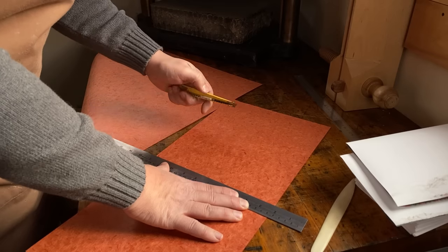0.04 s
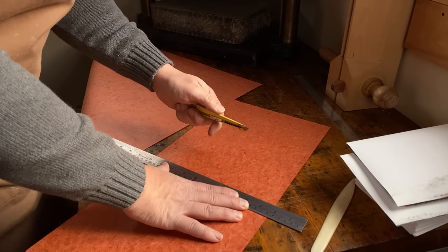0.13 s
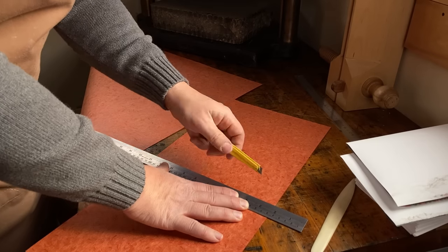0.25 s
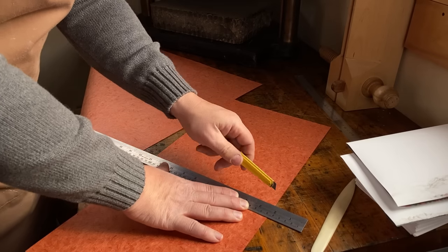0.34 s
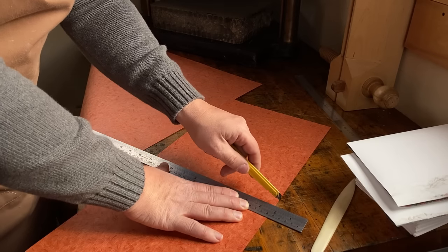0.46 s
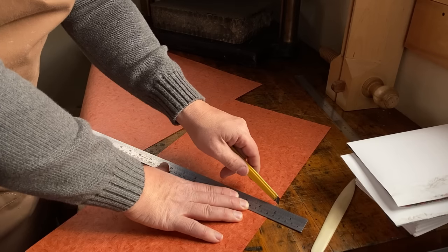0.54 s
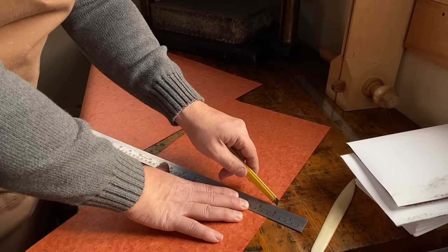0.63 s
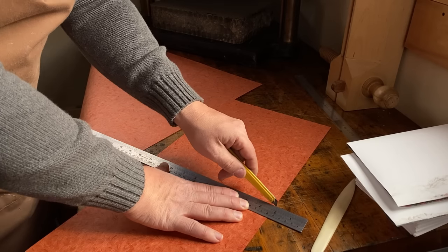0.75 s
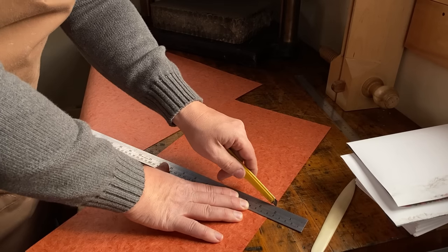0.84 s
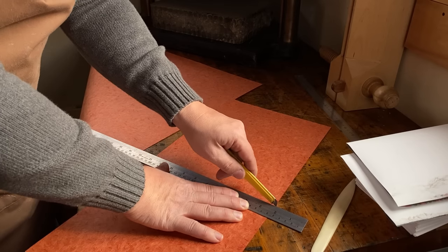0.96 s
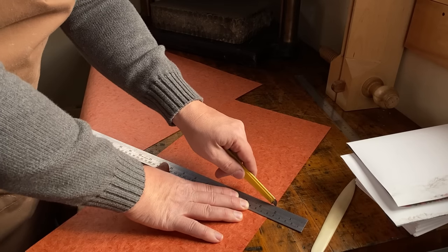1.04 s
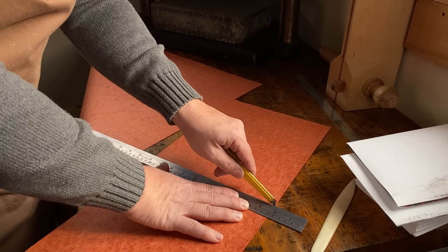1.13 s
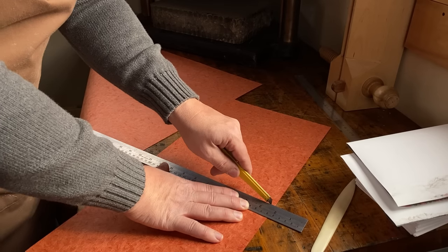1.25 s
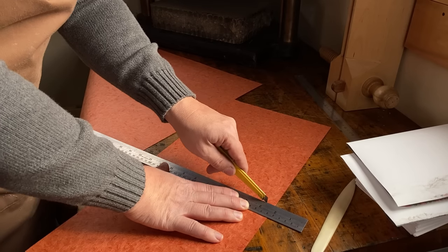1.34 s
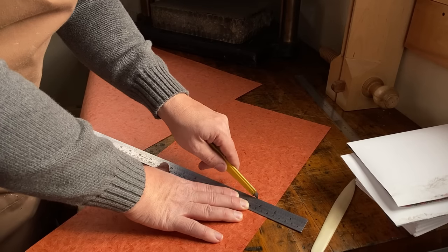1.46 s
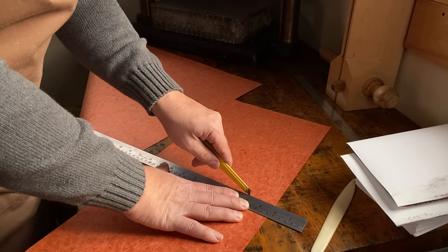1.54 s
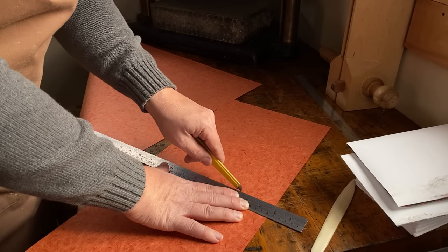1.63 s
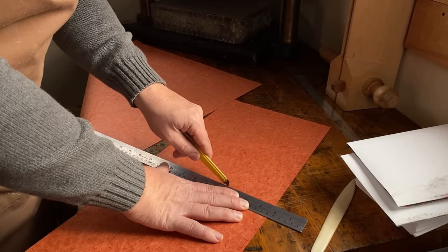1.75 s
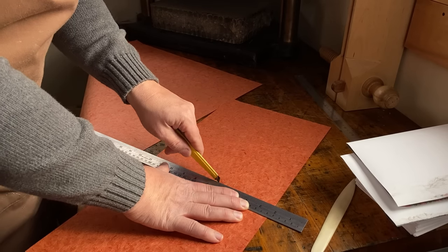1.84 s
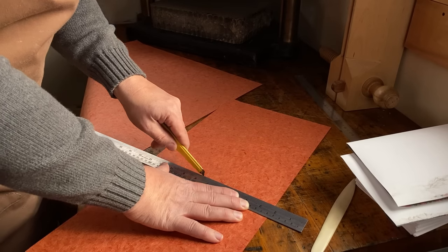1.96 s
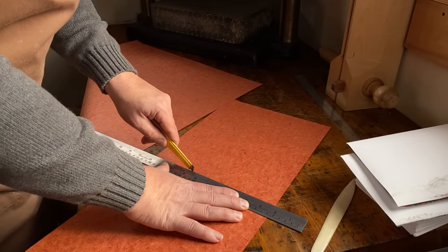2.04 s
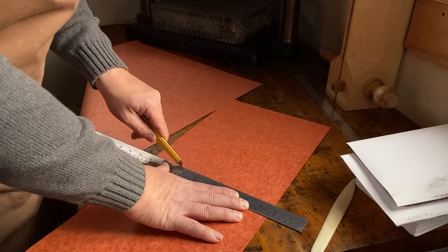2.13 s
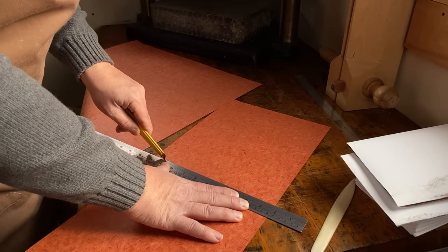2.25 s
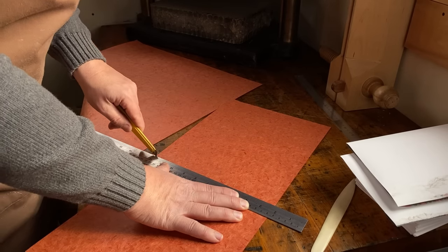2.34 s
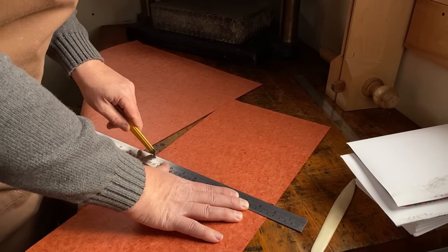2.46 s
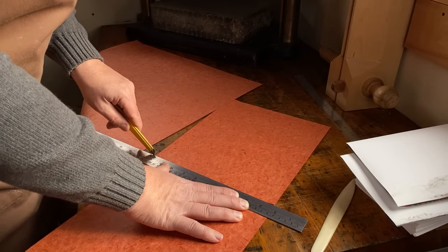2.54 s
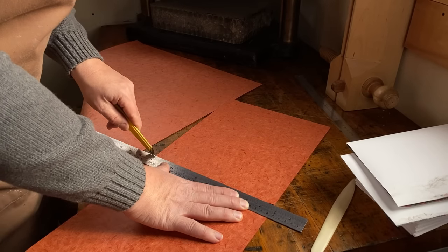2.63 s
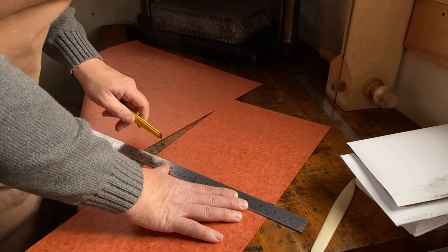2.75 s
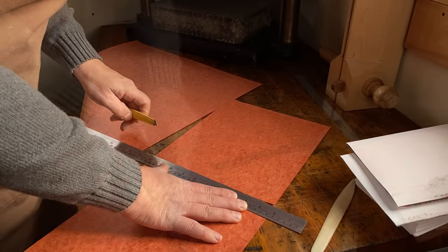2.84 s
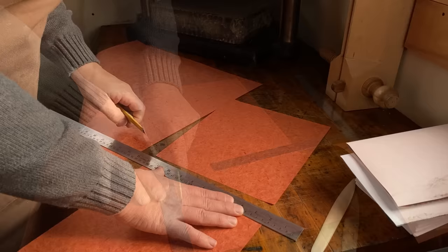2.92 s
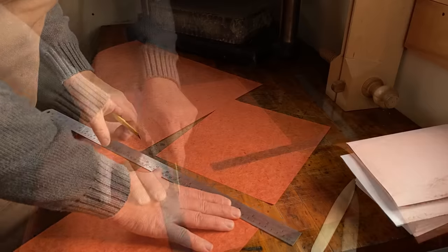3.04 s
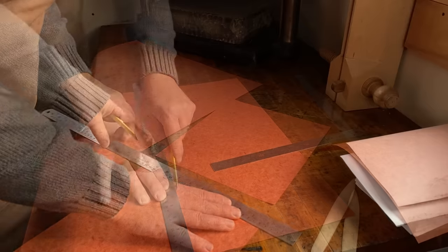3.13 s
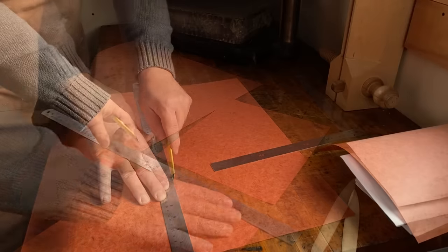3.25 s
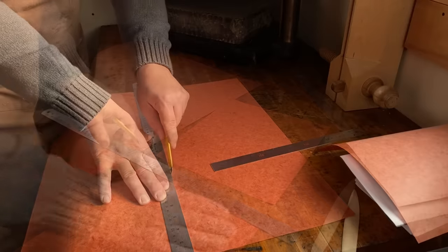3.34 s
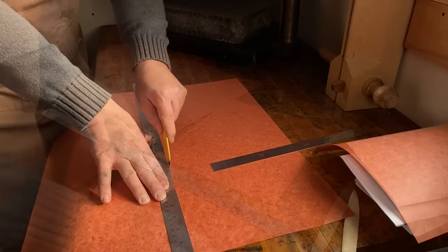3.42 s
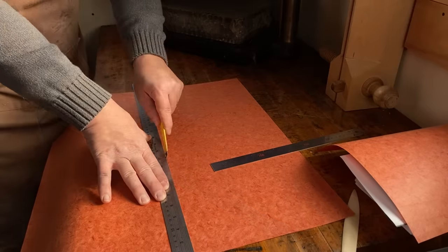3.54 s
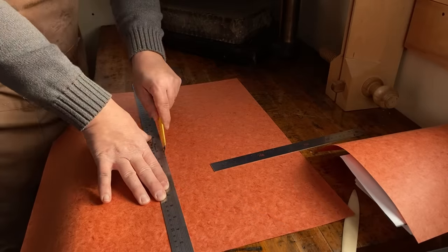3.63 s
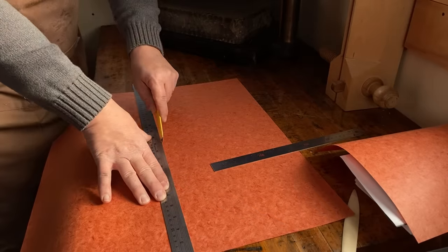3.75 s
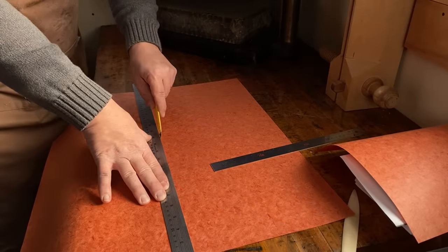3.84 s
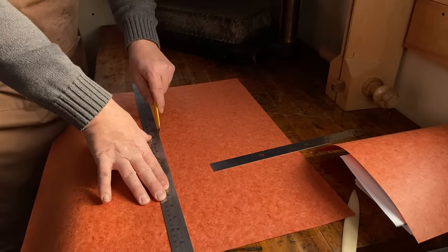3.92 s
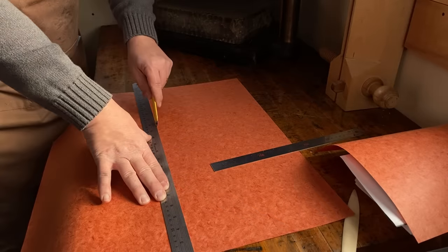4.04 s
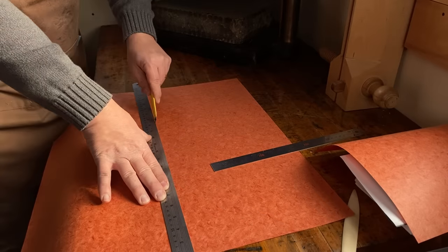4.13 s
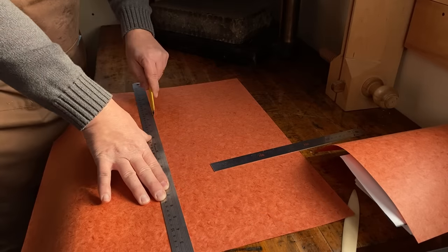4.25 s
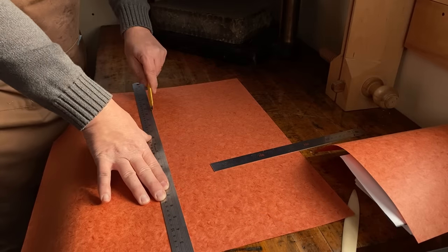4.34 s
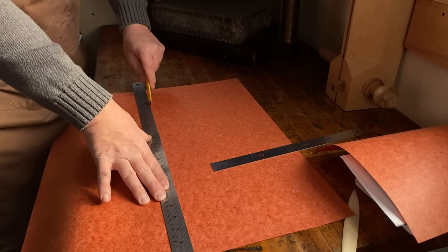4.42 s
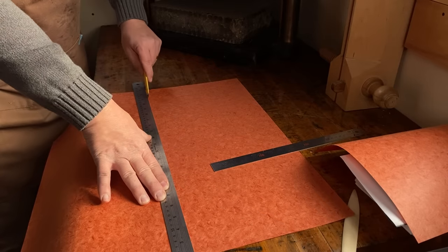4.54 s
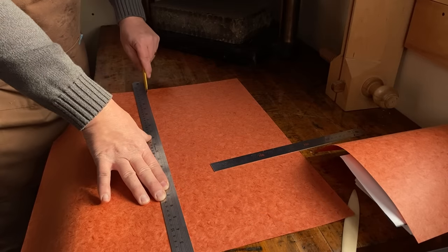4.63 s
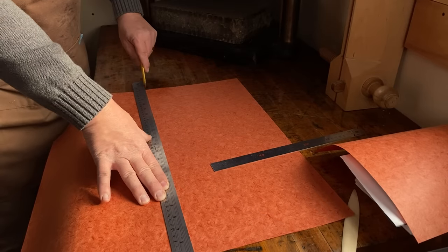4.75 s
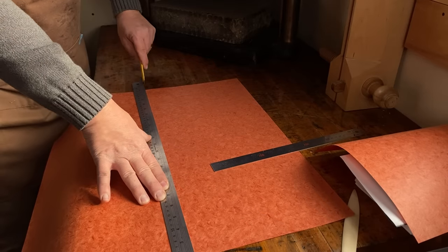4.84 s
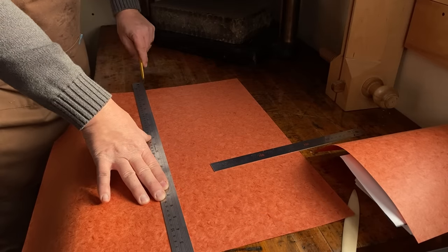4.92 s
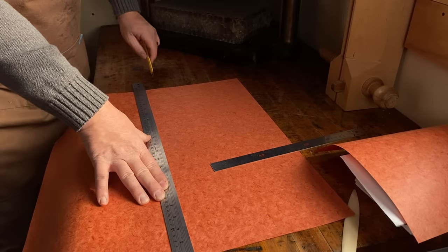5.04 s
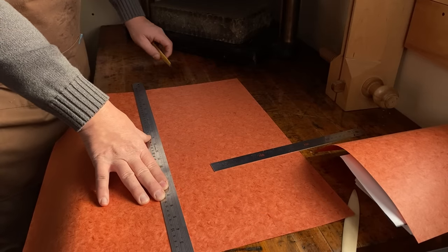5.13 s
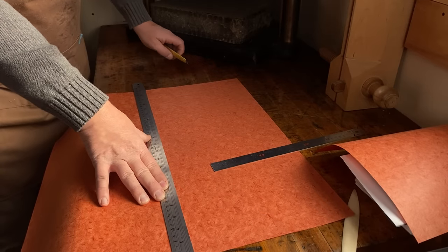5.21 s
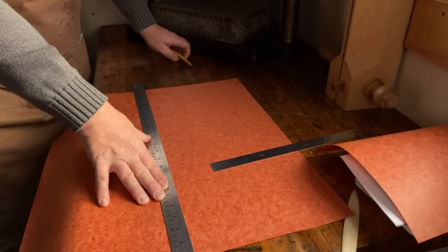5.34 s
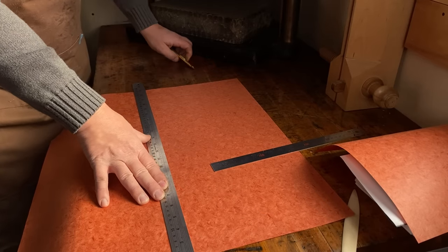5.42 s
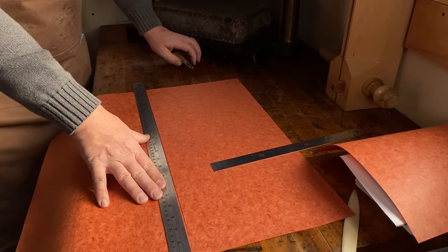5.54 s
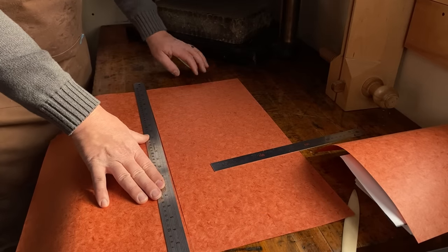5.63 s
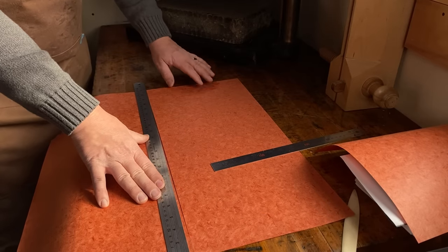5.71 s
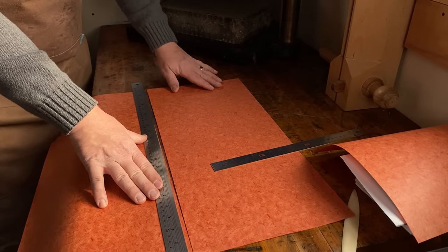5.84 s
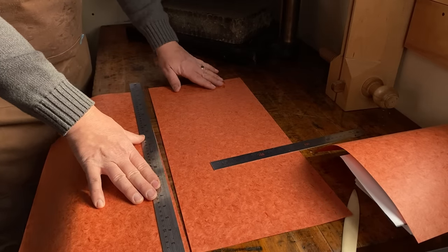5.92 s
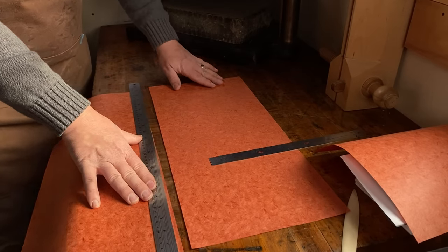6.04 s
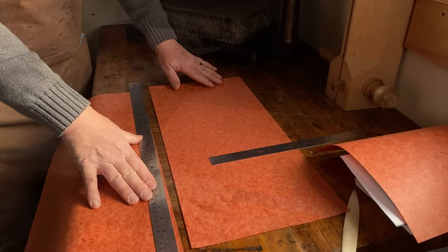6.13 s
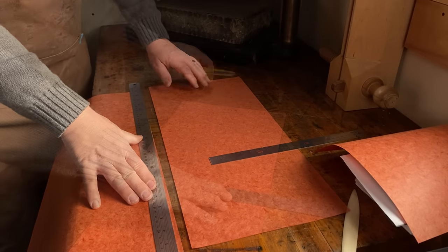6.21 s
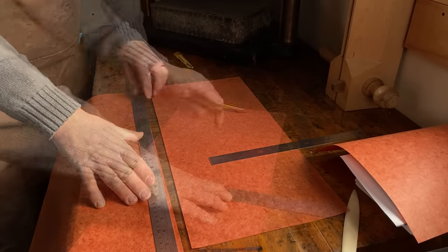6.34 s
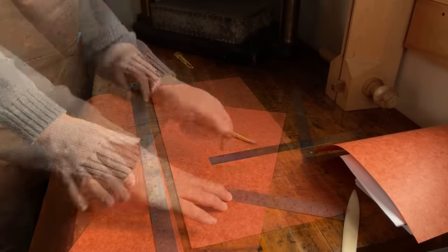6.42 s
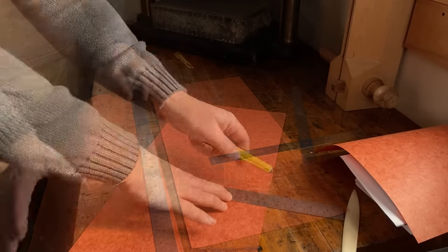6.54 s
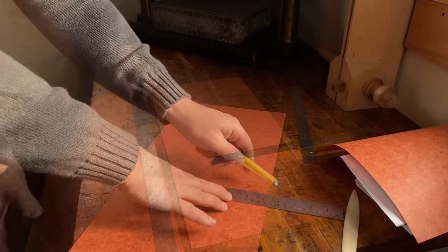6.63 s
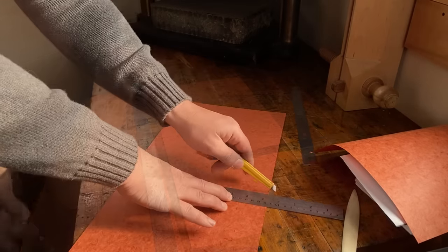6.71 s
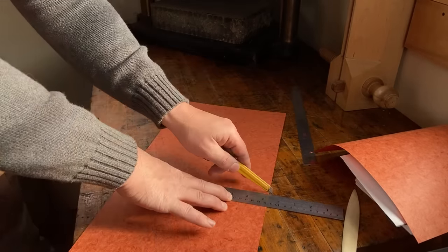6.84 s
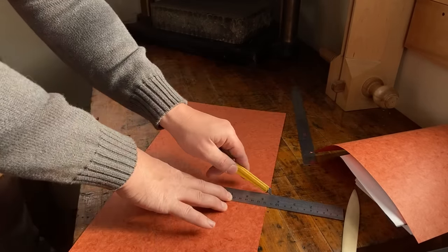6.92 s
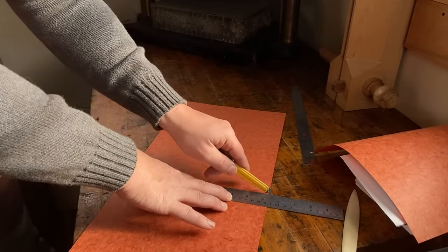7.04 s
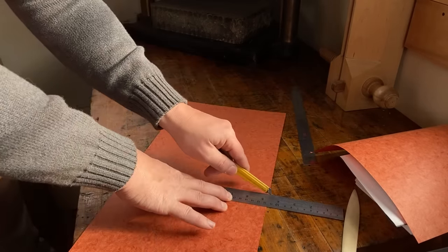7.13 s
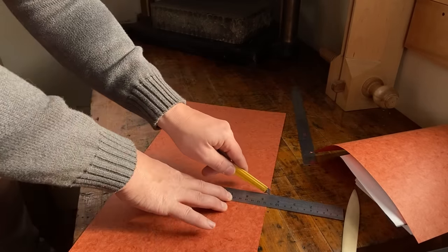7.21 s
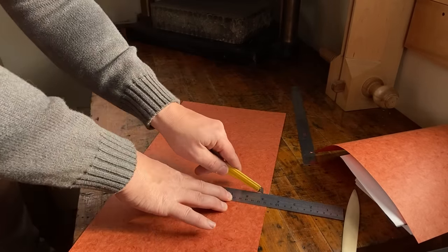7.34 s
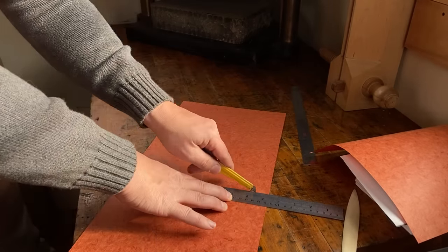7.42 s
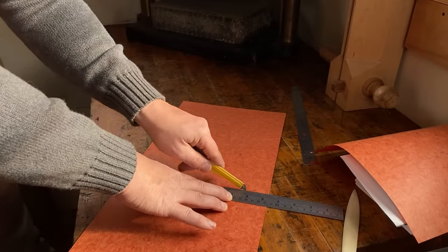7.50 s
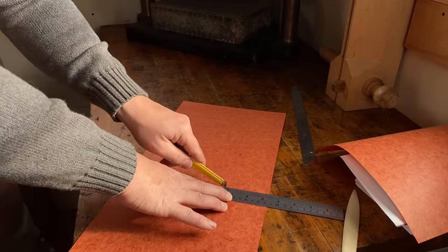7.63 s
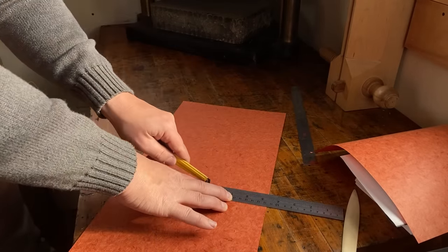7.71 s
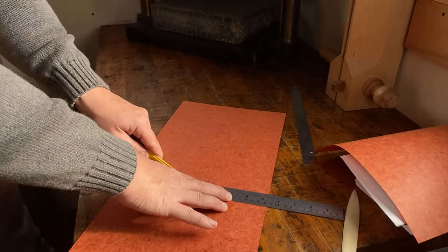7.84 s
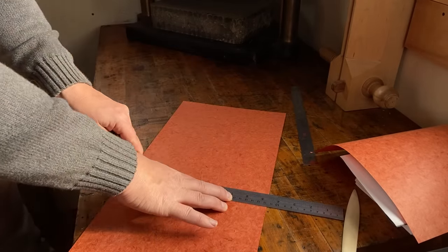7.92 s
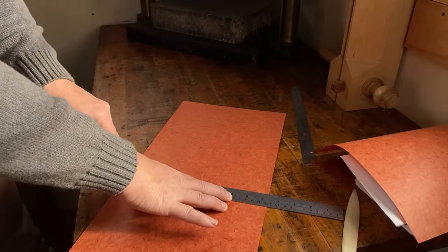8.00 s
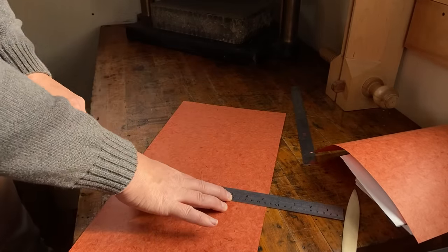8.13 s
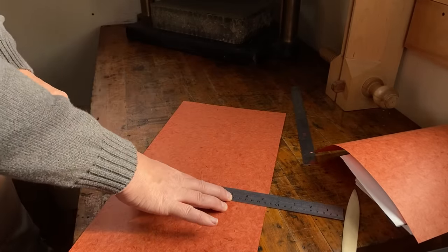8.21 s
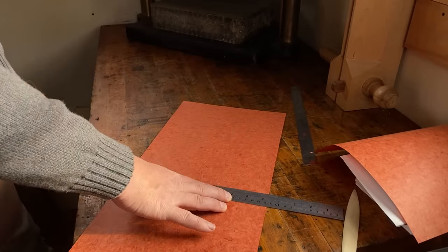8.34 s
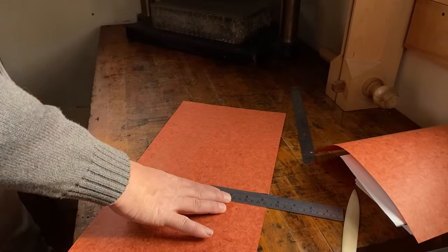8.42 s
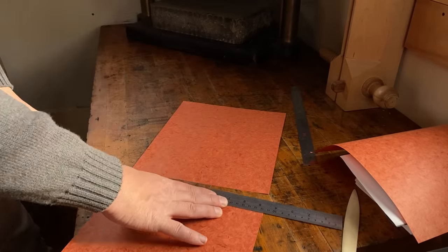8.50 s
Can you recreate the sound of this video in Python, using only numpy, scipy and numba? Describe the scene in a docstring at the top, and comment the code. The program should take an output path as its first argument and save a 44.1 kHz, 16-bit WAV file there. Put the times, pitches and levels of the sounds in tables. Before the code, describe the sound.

Three hissing knife strokes slice thick paper on a wooden bench, between blade ticks, a dropped knife bouncing and paper sliding.

```python
"""A snap-off knife cuts heavy paper three times along a steel ruler on a wooden bench.
Snapping fibres ring the blade and the bench, louder with speed. Between cuts the blade slider
ratchets, blade and ruler tick, the knife is dropped and bounces, and a hand slides the sheet aside.
One close microphone in a small, dry workshop with a faint hiss of air."""
import sys
import numpy as np
from scipy import signal
from scipy.fft import rfft, irfft
from scipy.io import wavfile
from numba import njit

SR = 44100
rng = np.random.default_rng(int(sys.argv[2]) if len(sys.argv) > 2 else 0)


def wav_out(sig):
    """Save sig, one row per channel (or a flat mono array), as 16-bit PCM at SR to the path in sys.argv[1]."""
    wavfile.write(sys.argv[1], SR, np.round(np.clip(np.atleast_2d(sig).T, -1, 1) * 32767).astype(np.int16))


N = 377937

# spectrum of a sharp tick: freq_hz, level_db
TICK_SPECTRUM = [(25, -79.5), (150, -41), (500, -29.5), (2000, -18.5), (2900, -12), (4100, 1), (5500, -3),
                 (6600, -1.5), (7800, 3.5), (8800, 1), (9900, 0.5), (11200, -9), (14500, -5.5),
                 (16000, -6.5)]
# spectrum of the knife body: freq_hz, level_db
KNIFE_SPECTRUM = [(25, -53), (130, -34), (230, -16.5), (540, -12), (760, -21), (980, -14), (1700, -13.5),
                  (3000, -17.5), (4300, -3.5), (7500, -3), (9900, -2), (11200, -13.5), (14000, -8),
                  (16000, -9)]


def cuts():
    """Three strokes; where the blade bites deep, and where it runs off the paper onto the wood at the end of
    the third, a coarse rasp takes over from the clean cut."""
    # bench resonances under each cut: centre_hz, width_hz, lift_db
    bench_1 = [(249, 49, 4.5), (353, 130, 4.5), (551, 14.6, 2.5), (716.5, 60.6, 14), (806.8, 71.4, 7.5),
               (953, 65, 6), (1369, 300, 4.5), (2280, 253, 2.5)]
    bench_2 = [(154, 43, 4.9), (400, 130, 8.5), (718, 43.5, 9), (974, 86, 8.9), (1330, 155, 3.6)]
    bench_3 = [(214, 46, 3), (420, 80, 4.5), (552, 41, 5), (697, 85, 15), (933, 81, 4.84), (1126, 137, 5.3),
               (1353, 244, 5.6)]
    # a deep bite in the second cut, then the blade running off the paper onto the wood at the end of the third:
    # start_s, rise_s, hold_s, release_s, relative_db, tilt_db_per_oct
    bites = [(4.02, .4, .215, .24, -25.3, 0), (8.0, .05, .05, .06, -36.5, -7)]
    # tearing: freq_hz, level_db
    tear_spectrum = [(25, -70), (160, -42), (450, -11), (750, 0.5), (1450, -2), (2100, -7), (3300, 2.5),
                     (3900, 0.5), (4700, -3), (7000, -9), (11000, -24.5), (16000, -27.5)]
    sound = (stroke(bench_1, index=0, snaps_per_s=1500, spread_db=2, catch_db=-16)
             + stroke(bench_2, index=1, snaps_per_s=2000, spread_db=2, catch_db=-17.5)
             + stroke(bench_3, index=2, snaps_per_s=2000, spread_db=2.5, catch_db=-17.5))
    torn = fibres(1800, spread_db=1, rub_db=-5, judder_db=.75)
    for *timing, db, tilt in bites:
        depth = undb(db) * movement(*timing, curve=1.4)
        tearing = unit(through(torn, body(tear_spectrum, (), tilt)))
        sound = sound / (1 + depth / undb(-13)) + depth * tearing
    return sound


def stroke(bench_rings, index, snaps_per_s, spread_db, catch_db):
    """The same snapping fibres drive the bench (low rasp) and the thin blade (high hiss)."""
    # start_s, rise_s, hold_s, release_s, rise_exponent,
    # rasp_relative_db, rasp_start_share, hiss_relative_db, hiss_start_share
    strokes = [(1.075, .96, .26, .095, .9, -38.5, .02, -31.9, .05),
               (3.2075, 1.13, .32, .28, 2.1, -42, .85, -27.4, .39),
               (7.145, .59, .35, .135, 1.38, -36.2, .07, -29, .11)]
    start_s, rise_s, hold_s, release_s, curve, rasp_db, rasp_share, hiss_db, hiss_share = strokes[index]
    rasp = undb(rasp_db) * movement(start_s, rise_s, hold_s, release_s, rasp_share, curve)
    hiss = undb(hiss_db) * movement(start_s, rise_s, hold_s, release_s, hiss_share, curve)
    # cutting: freq_hz, level_db
    cut_spectrum = [(25, -62), (60, -43.5), (130, -28.5), (210, -23.5), (310, -8), (600, -3), (1200, -5),
                    (2000, -9.5), (3000, -16.5), (5000, -12.5), (7500, -12.7), (9500, -11), (11200, -17.8),
                    (15500, -17.2)]
    drag = fibres(snaps_per_s, spread_db, rub_db=-1.5, judder_db=.81)
    sound = unit(through(drag, body(cut_spectrum, bench_rings)))
    # the tip catches on tough fibres and pings
    catches = fibres(70, spread_db=3.5, rub_db=-39.5, judder_db=.5)
    pings = unit(through(catches, body(TICK_SPECTRUM, [(3936, 560, 13.7), (8390, 990, 5.8)])))
    sound = blade_ringing(sound + undb(catch_db) * pings, start_s, rise_s + hold_s + release_s, index)
    crossover_hz = 2500
    bench = signal.sosfilt(signal.butter(4, crossover_hz, "low", fs=SR, output="sos"), sound)
    blade = signal.sosfilt(signal.butter(4, crossover_hz, "high", fs=SR, output="sos"), sound)
    cutting = hiss > 0
    return rasp * bench / np.std(bench[cutting]) + hiss * blade / np.std(blade[cutting])


def fibres(snaps_per_s, spread_db, rub_db, judder_db):
    """Fibres snap at random with unequal force over smooth rubbing; the drag judders."""
    moments = np.flatnonzero(rng.random(N) < snaps_per_s / SR)
    force = undb(spread_db * np.minimum(rng.exponential(size=len(moments)), 3.5))
    snaps = np.zeros(N)
    snaps[moments] = force * rng.choice([-1, 1], len(moments))
    drag = unit(snaps) + undb(rub_db) * rng.standard_normal(N)
    return drag * undb(judder_db * walk(110))


def blade_ringing(x, start_s, length_s, index):
    """Blade and ruler resonances glide as the cutting angle flattens and waver with the grip."""
    # start_hz, end_hz, width_hz, change_db, cut_1_lift_db, cut_2_lift_db, cut_3_lift_db
    blade_modes = [(3700, 3840, 320, -1, 6, 3, 1), (4380, 3890, 350, -2, 5, 9.3, 10),
                   (5620, 5020, 380, -1, 3.5, 5.5, 8), (6820, 6720, 400, 1, 3, 7.5, -1),
                   (7800, 7560, 650, -10, 6.5, 2.5, 4.6), (8550, 8250, 380, 8, 1.5, 4, 1.7),
                   (9520, 9480, 450, -4, 0, 5.5, 2.5), (12950, 12880, 560, 0, 3, 9.5, 2)]
    out = x.copy()
    span = np.arange(int(start_s * SR), min(int((start_s + length_s) * SR), N))
    progress = np.linspace(0, 1, len(span))
    for start_hz, end_hz, width_hz, change_db, *lifts_db in blade_modes:
        glide_hz = start_hz + (end_hz - start_hz) * progress
        hz = glide_hz * (1 + .01 * walk(5.4, len(span)))
        db = lifts_db[index] + change_db * (progress - .5) + 1.6 * walk(14, len(span))
        out[span] += (undb(db) - 1) * resonate(x[span], hz, float(width_hz))
    return out


def dropped_knife(ring_db=-26.5, thud_db=-48, thud_hz=45, thud_t60_s=.083):
    """Each bounce clacks and rings the steel sleeve; the first landing also thuds the bench."""
    # start_s, level_db, tilt_db_per_oct
    bounces = [(5.4098, -4, 2), (5.419, -12.5, 0.5), (5.4232, -9.5, -0.5), (5.4735, -12.5, 1),
               (5.4765, -9.5, -1.5), (5.522, -13.5, -.5), (5.564, -28.5, -5), (5.59, -34.5, -5),
               (5.618, -33.5, 0.5)]
    # pitch_hz, relative_db, t60_s
    sleeve_modes = [(725, -22.5, 0.29), (1750, -12, 0.34), (3758, -18.5, .25), (4393, -7.5, .2),
                    (4850, 4, 0.11), (4870, -24.5, .28), (5000, -3, .25), (5550, -7, .28), (6988, -6, .2),
                    (7385, -7.5, .2), (7368, -1, 0.43), (7727, -2, .25), (8140, -8, .22), (8890, -22.5, .2),
                    (9597, -16.5, .18), (9670, 0, 0.06), (12230, -18.5, .2), (13710, -5.5, .2),
                    (15300, -8, .2)]
    track = clicks(bounces, KNIFE_SPECTRUM, [(4920, 360, 11)], rise_s=.00075)
    t = np.arange(SR // 2) / SR
    hz, mode_db, t60_s = np.transpose(sleeve_modes)[:, :, None]
    for start_s, db, _ in bounces:
        strike = rng.choice([-1, 1], hz.shape) * undb(mode_db + 2 * rng.standard_normal(hz.shape))
        # the loose blade shifts in the sleeve and detunes each bounce
        pitch_hz = hz * (1 + .0032 * rng.standard_normal(hz.shape))
        ring = np.sum(strike * fade(t, t60_s) * np.sin(2 * np.pi * pitch_hz * t), axis=0)
        add(track, start_s, undb(db + ring_db) * ring)
    thud = np.sin(2 * np.pi * thud_hz * t) * fade(t, thud_t60_s)
    add(track, bounces[1][0], undb(thud_db) * thud)
    return track


def blade_slider():
    """The slider ratchets over its notches."""
    # start_s, level_db, tilt_db_per_oct
    notches = [(.679, -37.5, -1.5), (.6845, -26, -2), (.690, -22, -2.7), (5.234, -25, 6),
               (5.2432, -16.5, -2), (5.2468, -14.5, 4), (6.707, -28, -2), (6.850, -43.5, -7),
               (6.854, -33, -3.5), (6.866, -36.5, -5.5)]
    # freq_hz, level_db
    slider_spectrum = [(25, -73), (100, -46.5), (300, -31), (700, -28), (1500, -25.5), (3000, -18.5),
                       (4000, -8), (7500, -5.5), (9800, -5), (11000, -13.5), (13500, -9), (16000, -16)]
    # centre_hz, width_hz, lift_db
    slider_rings = [(1060, 200, 9), (1977, 140, 8.5), (2650, 160, 6), (3200, 250, 2.5), (3760, 420, 7.5),
                    (4150, 250, 4.5), (5060, 350, 8), (6100, 300, 2.5), (7460, 430, 5.5), (8450, 300, 2.5),
                    (9200, 300, 1)]
    return clicks(notches, slider_spectrum, slider_rings, rise_s=.0028)


def ticks(gap_s=.04, scatter_db=1.8):
    """Blade, ruler and paper edge tick; fainter, uneven ticks come as the grip settles."""
    # start_s, level_db, tilt_db_per_oct
    sharp_ticks = [(.023, -38.5, -2), (.069, -40.5, 0), (.1195, -39.5, -4), (.261, -47.5, -2),
                   (.548, -42, -2), (1.120, -45.5, 0), (1.897, -30, -3), (2.007, -28, 1.5),
                   (2.115, -28, -7.5), (2.285, -29.5, 1.5), (2.325, -35, -3.5), (2.575, -45.5, -2),
                   (2.602, -41, -9), (2.638, -34, -1.5), (2.816, -35.5, -1.5), (2.982, -42.5, 0),
                   (3.025, -50.5, -14), (3.250, -33, 2), (3.678, -20.5, 4), (4.665, -23, -8),
                   (4.798, -32.5, -6), (4.871, -33, -6), (4.907, -35.5, -1), (5.053, -50, -3),
                   (7.149, -40, -5), (7.480, -35, -5), (8.034, -21.5, -6), (8.1495, -27.5, -4.5),
                   (8.278, -30, -1.5), (8.324, -34.5, -3), (8.525, -32.5, 2)]
    # grip settling: start_s, end_s, start_db, end_db
    fidgets = [(0, .3, -41, -54), (2.55, 2.62, -50, -50)]
    faint_ticks = []
    for start_s, end_s, start_db, end_db in fidgets:
        for slot_s in np.arange(start_s, end_s, gap_s):
            db = np.interp(slot_s, [start_s, end_s], [start_db, end_db])
            db += scatter_db * rng.standard_normal()
            tick_s = slot_s + gap_s * rng.random() / 2
            tilt = 2 * rng.standard_normal() - 1
            faint_ticks.append((tick_s, db, tilt))
    return clicks(sharp_ticks + faint_ticks, TICK_SPECTRUM, (), rise_s=.00077)


def ruler():
    """The steel ruler clicks as the hand shifts on it."""
    # start_s, level_db, tilt_db_per_oct
    shifts = [(8.2525, -34.5, 2), (8.4048, -22.5, 1), (8.434, -39.5, -3)]
    # centre_hz, width_hz, lift_db
    ruler_rings = [(2840, 850, 13), (4730, 2100, -4), (7700, 680, 10), (9730, 300, 7.5)]
    return clicks(shifts, TICK_SPECTRUM, ruler_rings, rise_s=.00038)


def paper_slides():
    """Paper glides over the bench under a hand or sleeve, with a fine grain."""
    # start_s, rise_s, hold_s, release_s, relative_db, tilt_db_per_oct
    slides = [(0, .13, .11, .3, -53.5, -.3), (2.49, .06, .1, .1, -53.5, -7),
              (2.765, .06, .07, .19, -42.5, 0), (3.03, .08, .09, .03, -59, 0),
              (5.67, .125, .19, .08, -37.8, -.3), (6.18, .12, .2, .2, -54, -.4),
              (8.18, .02, .2, .1, -53.5, 0), (8.41, .11, .04, .06, -40, -.8)]
    # freq_hz, level_db
    paper_spectrum = [(35, -77), (60, -32), (192, -29.5), (394, -5), (572, -4.5), (738, 1), (1070, 0),
                      (1450, -0.5), (2050, 0.5), (6560, -1.5), (11500, -8.5), (15500, -12.5)]
    grain = fibres(3000, spread_db=4.5, rub_db=.5, judder_db=1.3)
    return sum(undb(db) * movement(*timing) * unit(through(grain, body(paper_spectrum, (), tilt)))
               for *timing, db, tilt in slides)


def handle_scuffs():
    """The knife handle scuffs and rattles over paper and wood."""
    # start_s, rise_s, hold_s, release_s, relative_db
    scuffs = [(2.49, .04, .01, .03, -48), (4.97, .045, .01, .06, -53), (5.335, .025, .045, .01, -39.5),
              (5.43, .02, .15, .02, -28.5)]
    scrape = fibres(900, spread_db=3.5, rub_db=-2, judder_db=3)
    handle = unit(through(scrape, body(KNIFE_SPECTRUM, [(4950, 600, 3.6), (7800, 1200, 4)])))
    return handle * sum(undb(db) * movement(*timing) for *timing, db in scuffs)


def workshop(x, wet_db, t60_s, size=16384):
    """Near walls add short reflections; their pattern changes as the hands move."""
    t, hop = np.arange(size) / SR, N // 32
    out = x.copy()
    for centre in range(0, N + hop, hop):
        span = np.arange(max(centre - hop, 0), min(centre + hop, N))
        tail = rng.standard_normal(size) * fade(t, t60_s) * (t > .002)
        piece = x[span] * np.cos(np.pi / 2 * (span - centre) / hop)
        reflections = signal.fftconvolve(piece, tail) / np.linalg.norm(tail)
        add(out, span[0] / SR, undb(wet_db) * reflections)
    return out


def room_tone(hiss_db=-62.5):
    """Steady hiss under a soft swell of air."""
    # freq_hz, level_db
    hiss_spectrum = [(15, -78.5), (25, -52.5), (86, -22.5), (173, -25), (198, -9), (233, -12), (274, -7.5),
                     (741, -5), (804, -2), (871, -11.5), (1200, -8.5), (1710, -6), (15500, -17.5)]
    air_spectrum = [(20, -42.5), (55, -14.5), (110, -19), (300, -5), (900, 7.5), (2000, -3), (5000, -9.5),
                    (16000, -24)]
    # time_s, level_db
    air_swell = [(0, -69.5), (2.9, -62.5), (3.3, -63.5), (5.1, -57.5), (6.1, -57.5), (6.7, -67),
                 (8.57, -65)]
    hiss = unit(through(rng.standard_normal(N), body(hiss_spectrum)))
    air = unit(through(rng.standard_normal(N), body(air_spectrum)))
    air_db = np.interp(np.arange(N) / SR, *np.transpose(air_swell))
    return undb(hiss_db) * hiss + undb(air_db) * air


def clicks(events, spectrum, rings, rise_s, t60_s=.014, size=4096):
    """Hard contacts on one object: each is a brief chatter into its body."""
    track, t = np.zeros(N), np.arange(size) / SR
    for start_s, db, tilt in events:
        chatter = rng.choice([-1, 1], size) * fade(t, t60_s) * (1 - np.exp(-t / rise_s))
        hit = through(chatter, body(spectrum, rings, tilt))
        rms = np.sqrt(np.sum(hit ** 2) / (.004 * SR))  # energy referred to 4 ms
        add(track, start_s, undb(db) * hit / rms)
    return track


def movement(start_s, rise_s, hold_s, release_s, start_share=0, curve=1):
    """Hand speed, 0-1: sets off, gathers pace, holds, brakes."""
    t = np.arange(N) / SR - start_s
    pace = start_share + (1 - start_share) * np.clip(t / rise_s, 0, 1) ** curve
    braking = np.clip(1 - (t - rise_s - hold_s) / release_s, 0, 1) ** 2
    return (t >= 0) * pace * braking


def body(spectrum, rings=(), tilt_db_per_oct=0, size=4096):
    """Minimum-phase impulse response: broad spectrum, resonant humps, tilt above 1 kHz."""
    hz = np.maximum(np.fft.rfftfreq(size, 1 / SR), 1)
    freq_hz, level_db = np.transpose(spectrum)
    db = np.interp(np.log(hz), np.log(freq_hz), level_db)
    db += tilt_db_per_oct * np.log2(np.maximum(hz, 1000) / 1000)
    for centre_hz, width_hz, lift_db in rings:
        db += lift_db / (1 + (2 * (hz - centre_hz) / width_hz) ** 2)
    cepstrum = irfft(np.log(undb(db)))
    cepstrum[1:size // 2] *= 2
    cepstrum[size // 2 + 1:] = 0
    return irfft(np.exp(rfft(cepstrum)))


@njit
def resonate(x, centre_hz, width_hz):
    """Band-pass with a moving centre, gain 1 there."""
    out, band_state, low_state = np.empty(len(x)), 0., 0.
    for i in range(len(x)):
        g, damping = np.tan(np.pi * centre_hz[i] / SR), width_hz / centre_hz[i]
        band = (band_state + g * (x[i] - low_state)) / (1 + g * (g + damping))
        band_state = 2 * band - band_state
        low_state += 2 * g * band
        out[i] = damping * band
    return out


def walk(rate_hz, size=N):
    """Smooth random wander, spread near 1."""
    steps = np.arange(size) / SR * rate_hz
    return np.interp(steps, np.arange(size // 20), rng.standard_normal(size // 20))


def through(x, response):
    """Convolve, keeping the length."""
    return signal.oaconvolve(x, response)[:len(x)]


def fade(t, t60_s):
    """Exponential decay."""
    return np.exp(-np.log(1000) * t / t60_s)


def undb(db):
    """Decibels to gain."""
    return 10 ** (np.asarray(db) / 20)


def unit(x):
    """Scale to rms 1."""
    return x / np.sqrt(np.mean(x ** 2))


def add(track, start_s, sound):
    """Mix a sound in at start_s."""
    start = max(int(start_s * SR), 0)
    part = sound[:N - start]
    track[start:start + len(part)] += part


def scene():
    """Friction and hits on the bench, heard in the room; mono."""
    friction = cuts() + undb(-1.5) * paper_slides() + handle_scuffs()
    friction = undb(-2.5) * workshop(friction, wet_db=-4, t60_s=.14)
    hits = blade_slider() + ticks() + ruler() + dropped_knife()
    hits = workshop(hits, wet_db=-2, t60_s=.1606)
    return (friction + hits + room_tone())[None]


def record(dry):
    """Clip at full scale, then low-pass at 15.8 kHz."""
    return signal.sosfilt(signal.ellip(10, .2, 70, 15800, fs=SR, output="sos"), np.clip(dry, -1, 1))


dry = scene()
out = record(dry)
wav_out(out)
```